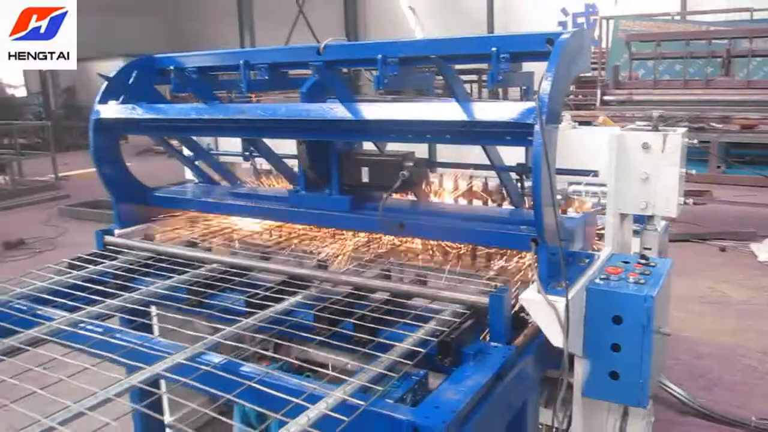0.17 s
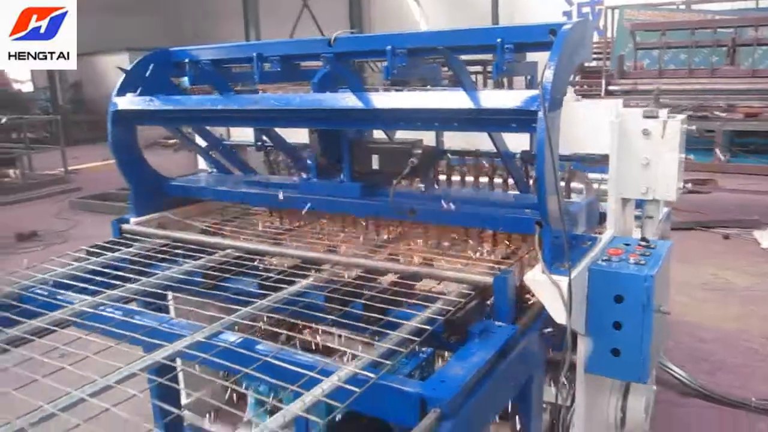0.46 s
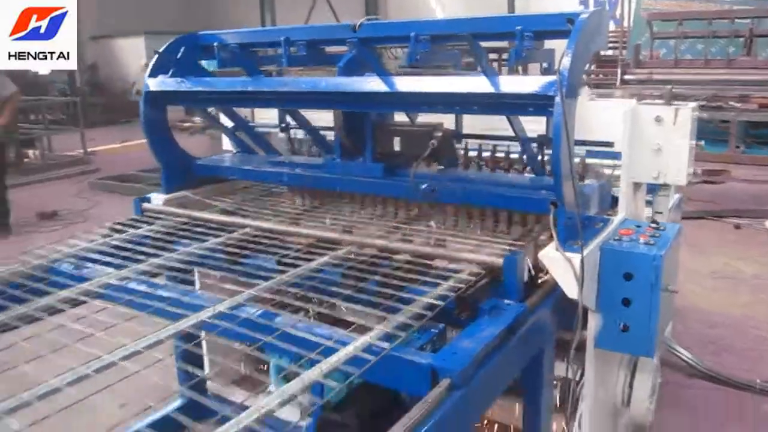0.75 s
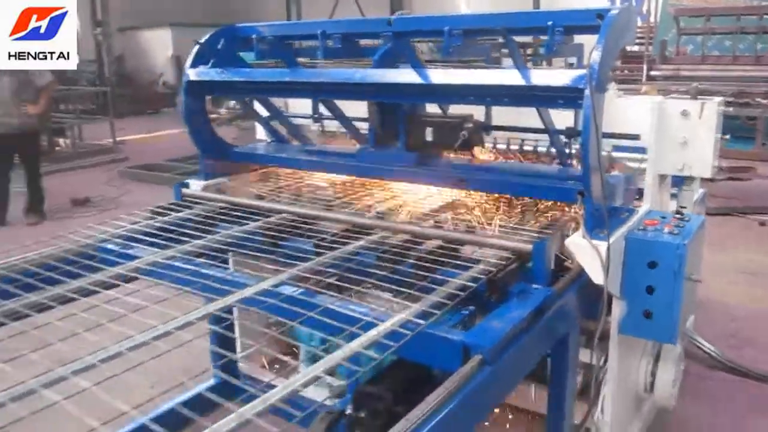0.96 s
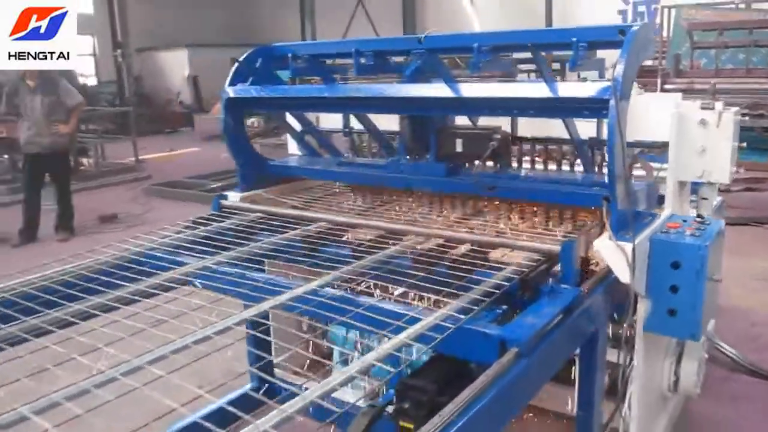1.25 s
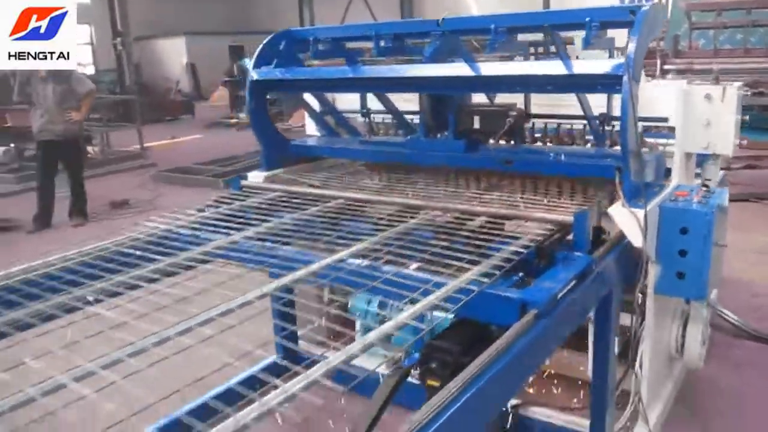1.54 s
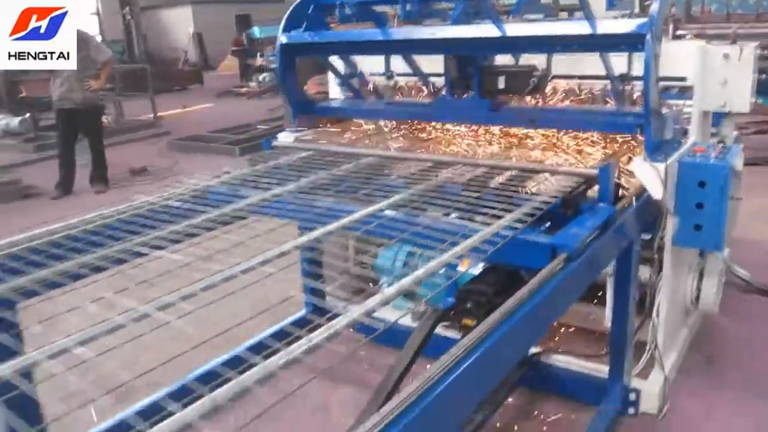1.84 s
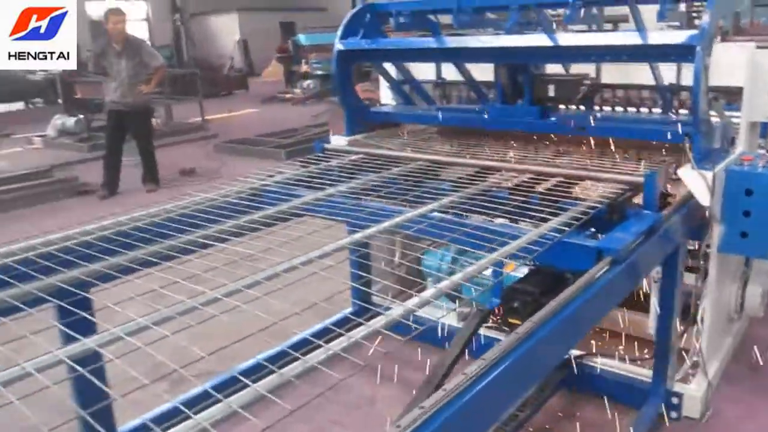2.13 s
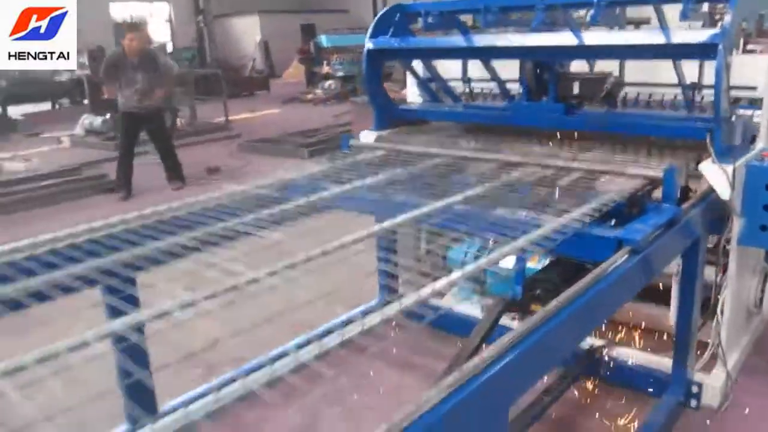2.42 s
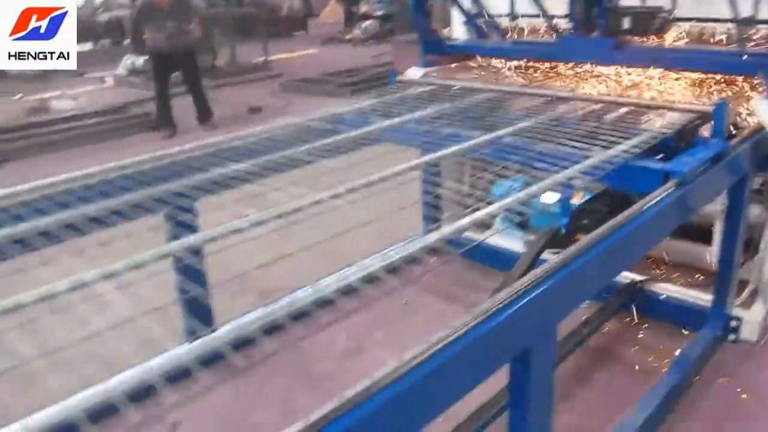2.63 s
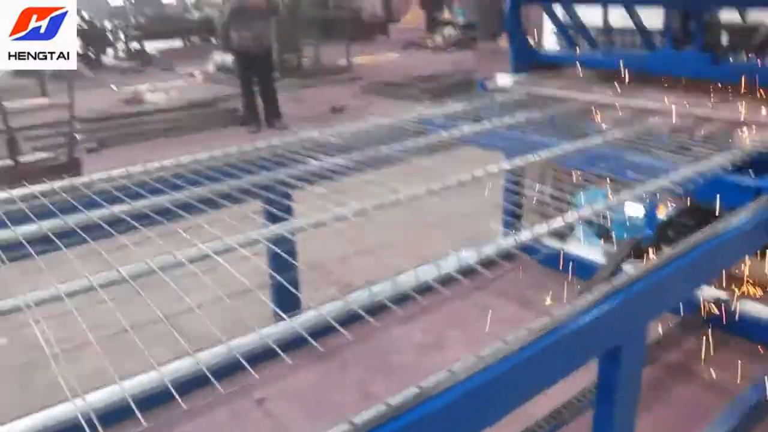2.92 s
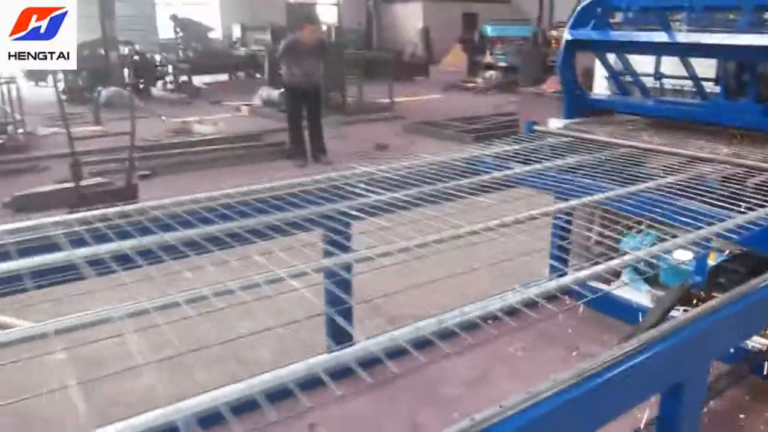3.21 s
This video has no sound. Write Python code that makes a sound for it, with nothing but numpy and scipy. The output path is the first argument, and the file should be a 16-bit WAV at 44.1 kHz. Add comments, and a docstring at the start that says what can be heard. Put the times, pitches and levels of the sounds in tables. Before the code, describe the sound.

Motors roar and hum in an echoing factory hall as a nearby mesh welding machine strokes four times: the press thuds, the weld snaps and sizzles, a valve clicks, air hisses briefly, and a wire clatters onto steel.

```python
"""A wire mesh welding machine, heard close by in a factory hall, runs through a 0.8 s cycle four times.
The press beam thuds down, the electrodes snap on and weld in a crackle of mains half-waves, a valve
clicks, air puffs out, then a cross wire drops on the steel frame and rings. A loose part pings once.
Motors roar and hum throughout, and the hall answers each stroke. The microphone is a small stereo one
on a camera, with a notch in its treble; it opens just after the beginning."""
import sys
import numpy as np
from scipy import signal
from scipy.fft import rfft, irfft, next_fast_len
from scipy.io import wavfile
from scipy.ndimage import uniform_filter1d, map_coordinates

SR = 44100
rng = np.random.default_rng(int(sys.argv[2]) if len(sys.argv) > 2 else 0)


def dump_mix(stems):
    """Bounce the given channels to the path in sys.argv[1] as a 16-bit WAV at rate SR."""
    frames = np.atleast_2d(stems).T  # one column per channel
    limited = np.clip(frames, -1, 1)  # hard clip at full scale
    pcm = np.round(limited * 32767).astype(np.int16)
    wavfile.write(sys.argv[1], SR, pcm)


N = 148176
T = np.arange(N) / SR

# stereo width at the microphone: (frequency [Hz], side over mid [dB])
STEREO_WIDTH = [(30, -21), (80, -34), (250, -23), (500, -15), (1000, -13.5), (2000, -8.5), (4000, -1.5),
                (12000, -1)]


def amp(db):
    """Decibels to gain."""
    return 10 ** (np.asarray(db) / 20)


def unit(x):
    """Scaled to rms 1."""
    return x / np.sqrt(np.mean(x ** 2) + 1e-20)


def along(points, hz):
    """Reads (frequency, value) points on a log frequency axis."""
    knots_hz, values = np.transpose(points)
    return np.interp(np.log(hz + 1), np.log(knots_hz + 1), values)


def curves(rows):
    """One value per sample for each column after the time."""
    times, *columns = np.transpose(rows)
    return [np.interp(T, times, column) for column in columns]


def wobble(rate):
    """A smooth random curve, rate knots a second."""
    return map_coordinates(rng.standard_normal(int(N * rate / SR) + 4), [T * rate])


def filtered(x, response):
    """x through a complex frequency response."""
    size = next_fast_len(N + SR // 2)
    return irfft(rfft(x, size) * response(np.fft.rfftfreq(size, 1 / SR)), size)[..., :N]


def rush(spectrum, patchy_db, resonances=()):
    """Stereo noise of rms 1, shaped by a spectrum and resonances, with patches of random gain."""
    def mid_side_gain(hz):
        peaks_db = sum(db / (1 + (2 * (hz - centre) / width) ** 2) for centre, width, db in resonances)
        return amp(along(spectrum, hz) + peaks_db) * [np.ones_like(hz), amp(along(STEREO_WIDTH, hz))]
    cells = signal.stft(rng.standard_normal((2, N)), nperseg=512)[2]
    patches = uniform_filter1d(uniform_filter1d(rng.standard_normal(cells.shape[1:]), 5, 0), 5, 1)
    noise = signal.istft(cells * amp(patchy_db * unit(patches)), nperseg=512)[1][:, :N]
    mid, side = filtered(noise, mid_side_gain)
    return unit(np.array([mid + side, mid - side]))


def strokes(rows, attack_s, t60_s):
    """Envelopes that rise, hold and die, summed in power; rows are (time [s], hold [s], level [dB])."""
    power = np.zeros(N)
    for start, hold, db in rows:
        age = np.maximum(T - start, 0)
        decay = amp(db - 60 * np.maximum(age - hold, 0) / t60_s)
        power += (decay * (1 - np.exp(-age / attack_s))) ** 2
    return np.sqrt(power)


def ring(start_s, db, modes):
    """Struck modes that rattle as they die, with a phase of their own at each microphone port."""
    rattle_db, attack_s = 2.2, .00067
    hz, mode_db, t60 = np.transpose(modes)[:, :, None]
    first = round(start_s * SR)
    t = T[:min(SR // 4, N - first)]
    knots = rng.standard_normal((len(hz), 24))
    rattle = np.array([np.interp(t, np.linspace(0, .25, 24), row) for row in knots])
    gain = amp(db + mode_db + rattle_db * rattle - 60 * t / t60) * (1 - np.exp(-t / attack_s))
    phase = 2 * np.pi * hz * t + rattle / 2
    port_shift = rng.uniform(0.08, 0.23, hz.shape)
    out = np.zeros((2, N))
    out[:, first:first + len(t)] = [(gain * np.sin(phase + way * port_shift)).sum(0) for way in (1, -1)]
    return out


def favoured(modes, favour_hz, loss_db):
    """The modes, weaker by loss_db times the squared octaves from the favoured pitch."""
    return [(hz, db - loss_db * np.log2(hz / favour_hz) ** 2, t60) for hz, db, t60 in modes]


def motor_roar():
    """The motors rumble and roar through the housings, with hiss and a fizz of top treble above."""
    # the four bands: (time [s], rumble [dB], roar [dB], hiss [dB], fizz [dB])
    levels = [(.1, -27.5, -25.5, -31.5, -31.5), (.17, -34, -32, -28.5, -32), (.3, -33, -30, -33, -38.5),
              (.57, -34, -29.5, -34, -37.5), (.76, -33, -29.5, -31, -34.5), (.89, -31, -28.5, -31, -32.5),
              (.98, -31.5, -26.5, -29.5, -31), (1.16, -33.5, -30.5, -33, -39),
              (1.44, -32, -29, -32.5, -36.5), (1.57, -33, -30, -31, -35.5), (1.7, -30.5, -26.5, -29.5, -31),
              (1.83, -34.5, -32, -31, -36), (2.04, -30.5, -28.5, -30.5, -35),
              (2.36, -32.5, -30.5, -32.5, -36), (2.53, -29, -26.5, -32, -33),
              (2.8, -30.5, -28.5, -35, -38.5), (3.07, -31, -27.5, -36, -39), (3.25, -30, -28, -31, -33.5),
              (3.36, -30, -27.5, -32, -35.5)]
    # resonances of the machine housings: (frequency [Hz], width [Hz], boost [dB])
    housing = [(105.5, 34, 3.5), (239, 54, 4), (430, 30, 6.5), (628, 8.7, 7), (712, 27, 6), (1073, 97, 5),
               (1450, 320, 2)]
    # spectra of the bands: (frequency [Hz], relative level [dB])
    rumble_spectrum = [(20, -26), (40, -11), (70, -10), (140, -5), (270, -1.5), (550, -3.5), (700, -9.5),
                       (1000, -35), (4000, -66)]
    roar_spectrum = [(400, -34), (600, -9.5), (750, -3.5), (1100, -2.5), (2000, -4), (2600, -12.5),
                     (9000, -41)]
    hiss_spectrum = [(1200, -15), (2500, -4), (4000, -2), (6500, -4), (8000, -8), (9000, -63)]
    fizz_spectrum = [(7500, -47), (8300, -3), (9500, -3), (11500, 0), (14000, -8.5), (15700, -19)]
    rumble_db, roar_db, hiss_db, fizz_db = curves(levels) + .7 * wobble(9)  # the bands sway together
    rumble = amp(rumble_db + 0.37 * wobble(25.5)) * rush(rumble_spectrum, 1.0, resonances=housing)
    roar = amp(roar_db + 0.74 * wobble(29.96)) * rush(roar_spectrum, 1.48, resonances=housing)
    hiss = amp(hiss_db + 0.58 * wobble(39.54)) * rush(hiss_spectrum, patchy_db=1.5)
    fizz = amp(fizz_db + 0.65 * wobble(45)) * rush(fizz_spectrum, patchy_db=1.5)
    return rumble + roar + hiss + fizz


def motor_hum():
    """The motors hum on one tone that wavers in pitch, swells and sinks."""
    # swells of the hum: (time [s], level [dB])
    swells = [(0.1, -35), (0.15, -28), (0.21, -46), (0.82, -38.5), (0.9, -59), (1.19, -34.5), (1.24, -48),
              (1.45, -32), (1.69, -45), (1.74, -31), (1.82, -54), (1.97, -35.5), (2.46, -54), (2.52, -30),
              (2.9, -39), (2.98, -30.5), (3.16, -48), (3.36, -27)]
    hum_hz, waver_hz = 312.8, 1.34
    hum_db, = curves(swells)
    pitch = hum_hz + waver_hz * wobble(6.22)
    return amp(hum_db) * np.sqrt(2) * np.sin(2 * np.pi * np.cumsum(pitch) / SR)


def press():
    """The press beam lands with a dull thud at the start of each weld and clunks as it seats."""
    # beam strokes: (landing time [s], thud level [dB], seating time [s], clunk level [dB])
    landings = [(.151, -23, .157, -24), (.958, -21, .9595, -14), (1.757, -22, 1.7598, -17),
                (2.561, -22, 2.572, -22)]
    # spectrum of the thud: (frequency [Hz], relative level [dB])
    thud_spectrum = [(50, -28), (100, 10), (170, 2), (350, 0), (900, 8), (1800, -15), (3000, -24)]
    # modes of the beam: (frequency [Hz], level [dB], t60 [s])
    beam_modes = [(450, -2, .04), (850, 0, .04), (1200, -3, .03)]
    thuds = strokes([(s, 0, db) for s, db, _, _ in landings], attack_s=0.0016, t60_s=0.13)
    thuds = thuds * rush(thud_spectrum, patchy_db=5)
    return thuds + sum(ring(s, db, beam_modes) for _, _, s, db in landings)


def cracks(snaps):
    """The pressure pulse that opens each snap of the electrodes, alike at both ports."""
    width_s, boost_db = 0.0004, 12
    out = np.zeros(N)
    for start, db in snaps:
        age = np.maximum(T - start, 0) / width_s
        out -= amp(db + boost_db) * (age > 0) * (1 - age) * np.exp(-age)
    return out


def weld():
    """The electrodes snap and clink; each half-wave of current sputters low and sizzles high."""
    # the electrodes snap onto the wires: (time [s], level [dB])
    snaps = [(0.1581, -15), (0.959, -21), (.9625, -20), (1.7600, -12), (2.5726, -19.5)]
    # sputters, one per mains half-wave: (time [s], level [dB], sizzle over sputter [dB])
    sparks = [(.158, -13, 4), (.167, -12.5, -5), (.177, -16, 6), (.187, -12.5, -3), (.196, -12.5, -5),
              (0.9598, -20.5, 10), (.97, -21, 4), (.978, -13, 4), (0.99, -11, -3), (0.998, -13, -2),
              (1.761, -9.5, -0.5), (1.77, -18, 8.5), (1.781, -16, 0), (1.79, -16.5, -1), (1.799, -19, 2),
              (2.561, -18, -2), (2.571, -18, 4.5), (2.581, -23, 5), (2.592, -14.5, -7), (2.6, -9.5, -19)]
    # spectra of the sparks: (frequency [Hz], relative level [dB])
    sputter_spectrum = [(200, -30), (500, -3), (1500, -3), (2800, 1.5), (4000, 2), (5200, -4), (7000, -6),
                        (9000, -9)]
    sizzle_spectrum = [(6000, -27), (8500, -3.5), (11000, 6.5), (13500, -5), (15700, -15.5)]
    # some sputters come with a short metallic clink: (time [s], level [dB], favoured pitch [Hz])
    clinks = [(0.1593, -19, 3900), (1.76, -10, 2900), (1.7707, -15, 11500), (1.771, -16, 4000),
              (1.7827, -21, 4000), (1.8, -22, 4000), (2.573, -10.5, 8600), (2.602, -12.5, 3670)]
    # modes of the electrodes: (frequency [Hz], level [dB], t60 [s])
    electrode_modes = [(2500, -2, .03), (3950, 0, .028), (9150, 0, .026), (11500, 0, .025)]
    low_cut_hz = 300
    snap = strokes([(s, 0, db) for s, db in snaps], attack_s=.0001, t60_s=.022)
    sputter = strokes([(s, 0, db) for s, db, _ in sparks], attack_s=.001, t60_s=.036)
    sizzle = strokes([(s, 0, db + over) for s, db, over in sparks], attack_s=.001, t60_s=.03)
    grit = amp(1.5 * wobble(700))
    crackle = (sputter * grit + snap) * rush(sputter_spectrum, patchy_db=1.0)
    crackle += sizzle * grit * rush(sizzle_spectrum, patchy_db=0.5)
    rings = sum(ring(s, db, favoured(electrode_modes, hz, loss_db=30)) for s, db, hz in clinks)
    return filtered(crackle + cracks(snaps) + rings, lambda hz: (1j * hz / (low_cut_hz + 1j * hz)) ** 2)


def pneumatics():
    """A valve clicks after each weld, then air escapes."""
    # valve clicks: (time [s], level [dB])
    clicks = [(.2619, -16), (1.065, -17), (1.8674, -20), (2.668, -18.5)]
    # air puffs: (time [s], hold [s], level [dB])
    puffs = [(.308, 0.031, -22.5), (1.095, 0.021, -20), (1.943, 0.011, -21.5), (2.686, 0.04, -24.5)]
    # spectra of click and puff: (frequency [Hz], relative level [dB])
    valve_spectrum = [(500, -54), (1500, 7.5), (4000, 0.5), (7000, 4), (10000, -3), (13000, -0.5),
                      (16000, -27)]
    air_spectrum = [(1000, -9.5), (3300, 3.5), (5000, 2.5), (7000, -5), (11500, 0.5), (14000, -7.5),
                    (15700, -14)]
    valve = strokes([(s, 0, db) for s, db in clicks], attack_s=0.003, t60_s=0.13)
    air = strokes(puffs, attack_s=0.0024, t60_s=0.14)
    return valve * rush(valve_spectrum, patchy_db=2.5) + air * rush(air_spectrum, patchy_db=2.5)


def cross_wire():
    """The cross wire clatters onto the steel frame in a few contacts and rings."""
    # contacts: (time [s], clatter level [dB], ring level [dB], favoured pitch [Hz])
    drops = [(.641, -18.5, -30, 3870), (.644, -40, -20, 6400), (1.43, -20, -21, 1250),
             (1.441, -21, -28, 2800), (1.446, -34, -20.5, 5300), (2.257, -20, -28, 3000),
             (2.265, -24.5, -25, 3850), (2.272, -24, -22, 4400), (3.037, -23, -21, 2200),
             (3.044, -17.5, -27, 3900), (3.063, -24.5, -20.5, 3430), (3.066, -34, -26, 1250),
             (3.101, -38, -36, 3400)]
    # spectrum of the clatter: (frequency [Hz], relative level [dB])
    clatter_spectrum = [(500, -16), (1100, -7), (1800, 1), (2600, 4.5), (3900, 0.5), (5000, -5.5),
                        (6500, -8.5), (9000, -15), (15000, -32)]
    # modes of the wire: (frequency [Hz], level [dB], t60 [s])
    wire_modes = [(974, -2, .11), (1250, 0, .08), (1567, -1, .1), (1895, -4, .18), (2412, -4, .18),
                  (2557, -5, .12), (2988, -3, .1), (3609, 0, .16), (3962, 0, .06), (4281, -3, .27),
                  (4998, -5, .15), (5560, -8, .08), (6449, -2, .08)]
    clatter = strokes([(s, 0, db) for s, db, _, _ in drops], attack_s=0.0025, t60_s=0.2)
    grit = amp(0.86 * wobble(400))
    rings = sum(ring(s, db, favoured(wire_modes, hz, loss_db=80)) for s, _, db, hz in drops)
    return clatter * grit * rush(clatter_spectrum, patchy_db=3.0) + rings


def loose_part():
    """A loose part pings once, after the last wire has dropped."""
    # modes of the part: (frequency [Hz], level [dB], t60 [s])
    part_modes = [(829, -12, .07), (1300, -7, .08), (2229, 0, .13), (3165, -9, .1)]
    return ring(start_s=3.134, db=-21, modes=part_modes)


def hall(near):
    """The hall's answer: each frequency dies at its own speed, and the bass is alike at both ports."""
    # reverberation of the hall: (frequency [Hz], t60 [s])
    decay_times = [(200, 0.55), (2000, 0.85), (10000, 0.36)]
    hz, t, cells = signal.stft(rng.standard_normal((2, SR)), SR, nperseg=256)
    mid, side = cells * amp(-60 * t / along(decay_times, hz)[:, None])
    side *= amp(along(STEREO_WIDTH, hz))[:, None]
    tail = signal.istft(np.array([mid + side, mid - side]), SR, nperseg=256)[1]
    delayed = np.pad(near.mean(0), (400, 0))  # 9 ms behind the direct sound
    return signal.fftconvolve(delayed[None], tail / np.linalg.norm(tail[0]), axes=1)[:, :N]


def scene():
    """The machine's strokes close by, the hall behind them and the motors all through."""
    hall_db = -9.5
    near = press() + weld() + pneumatics() + cross_wire() + loose_part()
    return near + amp(hall_db) * hall(near) + motor_roar() + motor_hum()


def record(dry):
    """The camera microphone opens late, leans right in the mids and has a notch in its treble."""
    # balance of the ports: (frequency [Hz], left over right [dB])
    balance = [(500, 0), (1500, -1.5), (3000, -2), (6000, -1.5), (10000, 1)]
    notch_hz, notch_width_hz, notch_order = 8230, 770, 2.4
    left_lag_s, start_s, fade_s = 2e-5, .0945, 0.0017

    def microphone(hz):
        detuning = (hz * hz - notch_hz ** 2) / (hz + 1) / notch_width_hz
        notch = (np.abs(detuning) / np.sqrt(1 + detuning ** 2)) ** notch_order
        left = amp(along(balance, hz) / 2) * np.exp(-1j * np.pi * hz * left_lag_s)
        return notch * np.array([left, 1 / left])
    fade_in = np.clip((T - start_s) / fade_s, 0, 1)
    # the highest treble drops away above 15.75 kHz and is silent above 16.4 kHz
    shelf_hz, shelf_db, top_hz = 15750, -17, 16400
    heard = filtered(dry, lambda hz: microphone(hz) * amp(shelf_db * (hz > shelf_hz))) * fade_in
    return filtered(heard, lambda hz: hz < top_hz)


dry = scene()
out = record(dry)
dump_mix(out)
```